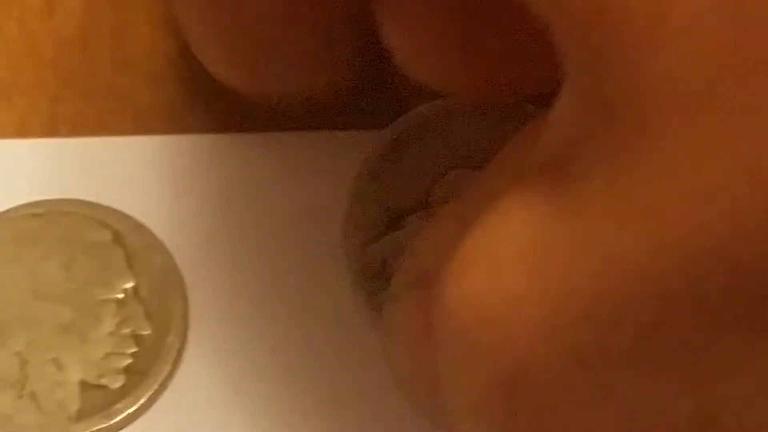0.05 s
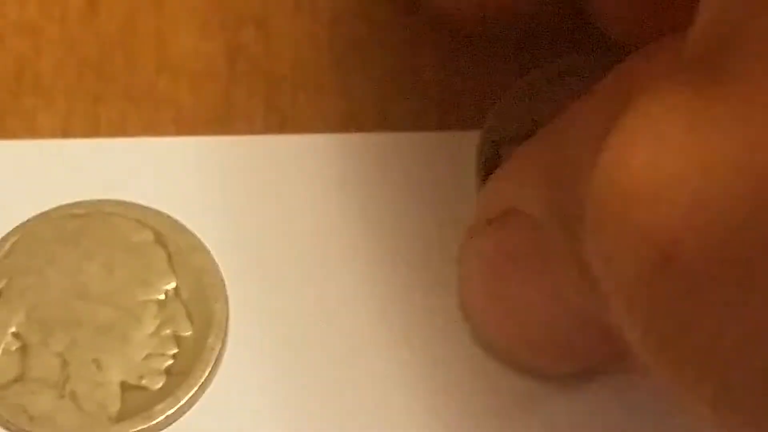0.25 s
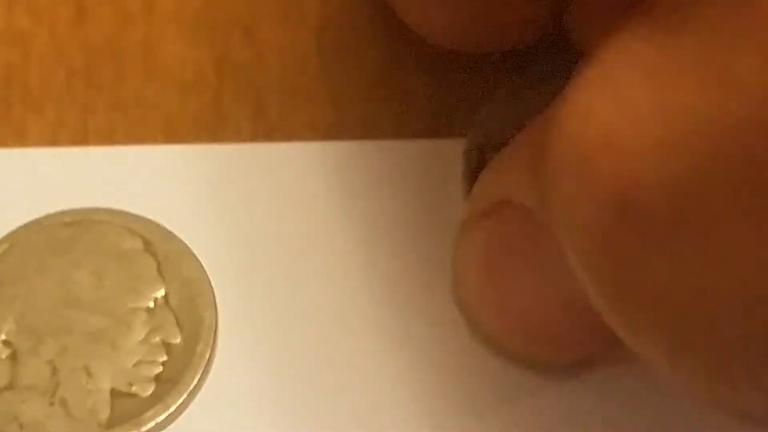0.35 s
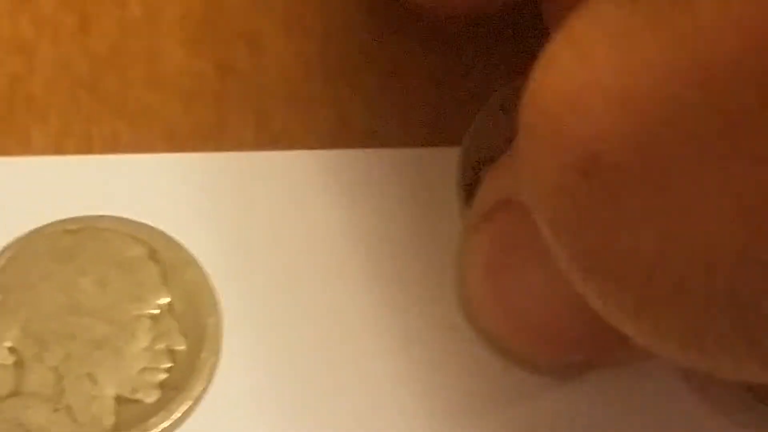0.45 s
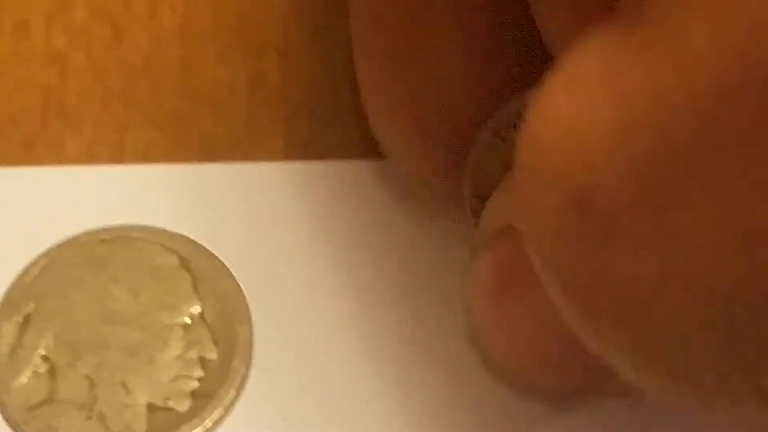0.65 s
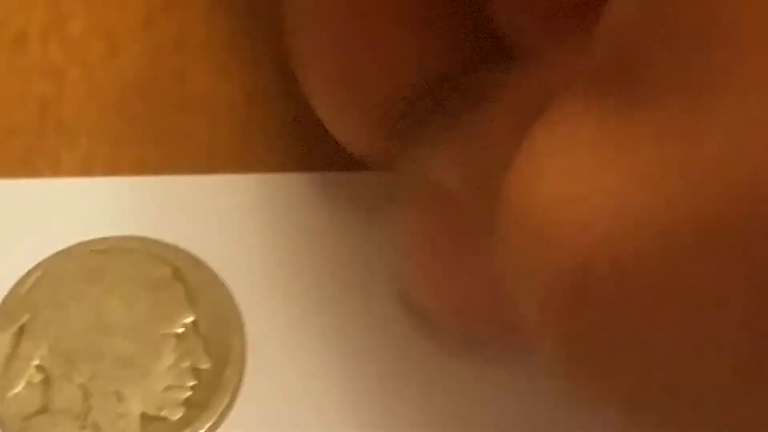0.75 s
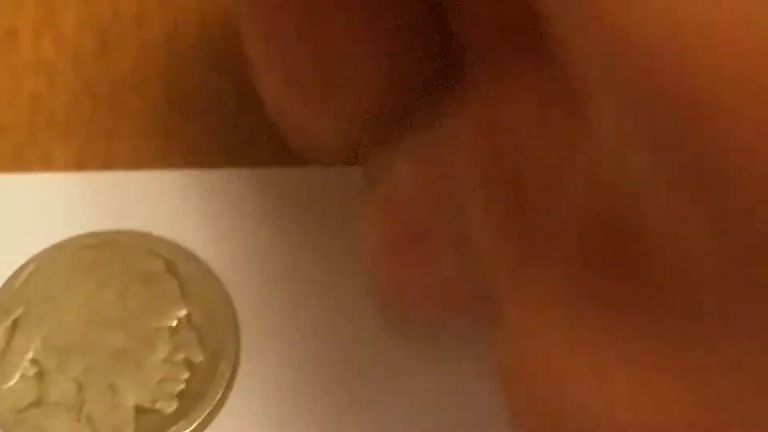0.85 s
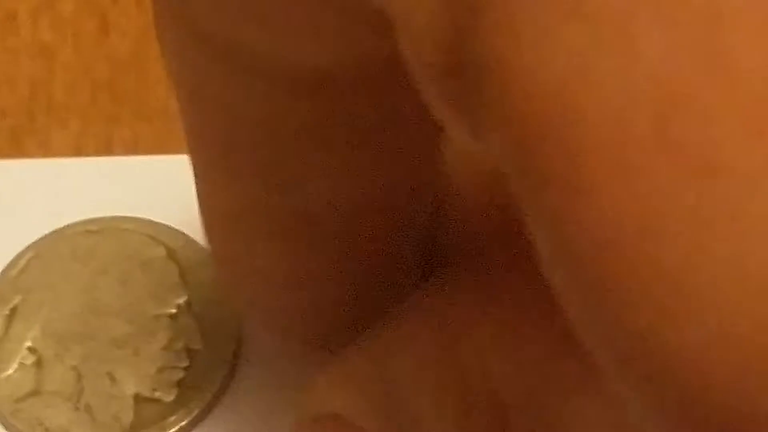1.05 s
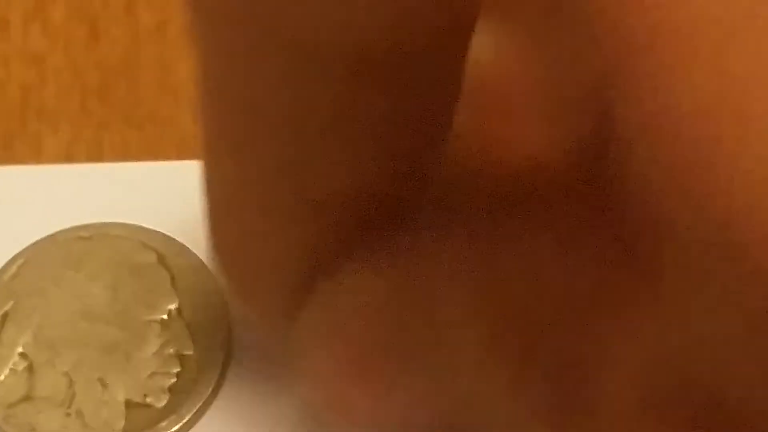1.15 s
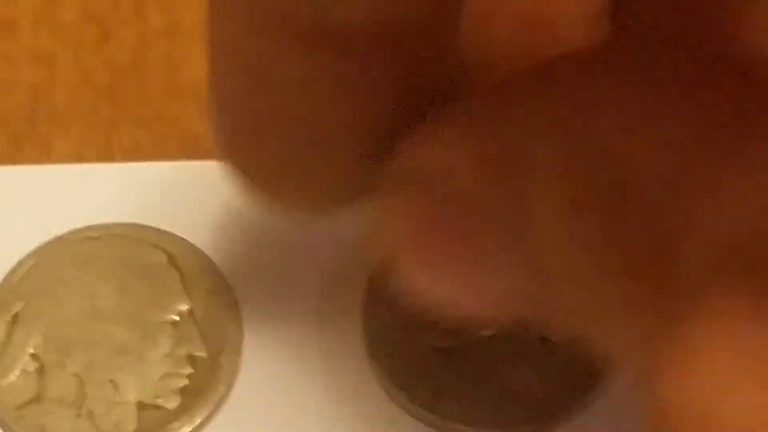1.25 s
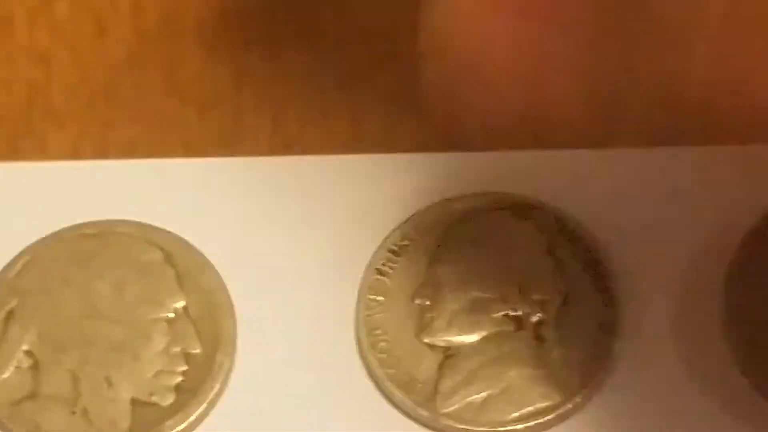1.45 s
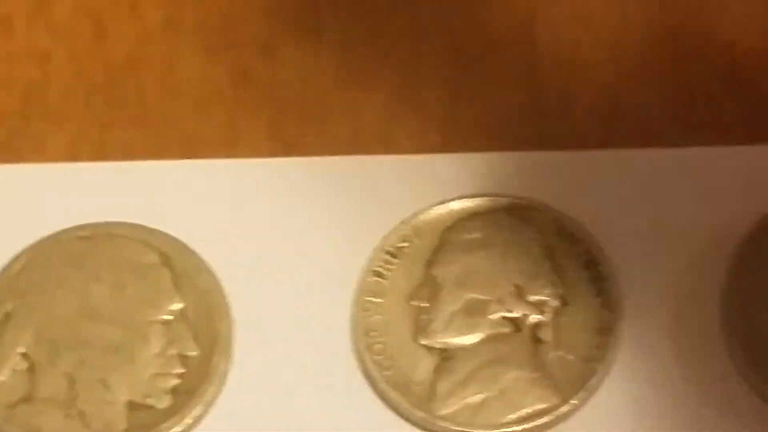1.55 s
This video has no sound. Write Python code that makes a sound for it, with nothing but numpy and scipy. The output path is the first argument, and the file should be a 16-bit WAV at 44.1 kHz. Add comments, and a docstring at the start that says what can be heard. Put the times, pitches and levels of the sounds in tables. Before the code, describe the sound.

Two close clicks of a coin turned over on a desk, the second one softer.

```python
"""A small coin is turned over by hand on a sheet of paper that lies on a wooden desk, heard close by.
It snaps down, rings very high for a moment and hits again; fingers nudge it and it is laid flat with a
lighter click. Each impact excites the coin's modes, and the small room answers it. Dull thumps sound
underneath and a finger brushes the paper. Low hum and hiss sink in the middle and come back."""
import sys
import numpy as np
from scipy import signal
from scipy.fft import rfft, irfft
from scipy.io import wavfile
from scipy.ndimage import uniform_filter1d

SR = 44100
rng = np.random.default_rng(int(sys.argv[2]) if len(sys.argv) > 2 else 0)


def unload_audio(sound):
    """Save the sound as a 16-bit wav file, at the path given as the first command line argument."""
    columns = np.transpose(np.atleast_2d(sound))
    # keep every value between -1 and 1, then stretch to whole-number steps
    steps = np.round(np.clip(columns, -1, 1) * 32767)
    wavfile.write(sys.argv[1], SR, steps.astype(np.int16))


N = 70560
T = np.arange(N) / SR
HZ = np.maximum(np.fft.rfftfreq(2 * N, 1 / SR), 1)

# Course of the background. Each row: time in seconds, then hum, rumble, hiss and treble levels in dB.
BACKGROUND_LEVELS = [(0, -58, -49.5, -58.5, -76.5), (0.132, -49.5, -58.5, -58, -78),
                     (0.191, -62, -54, -64.5, -82.5), (.33, -58, -65, -66, -82),
                     (.47, -64.5, -68.5, -76, -98), (.62, -63.5, -67, -79.5, -97),
                     (.87, -71, -76.5, -87, -99), (1.049, -67.5, -71.5, -89, -95.5),
                     (1.19, -62, -67, -80.5, -98), (1.319, -59, -62.5, -71.5, -83.5),
                     (1.45, -57.5, -59, -69.5, -93), (1.6, -59.5, -62.5, -67, -89.5)]
# Course of the deepest rumble. Each row: time in seconds, level in dB.
DEEP_LEVELS = [(0, -61.5), (.08, -65), (.15, -66), (.3, -64.5), (.5, -68.5), (.85, -82.5), (1.1, -71),
               (1.25, -71), (1.42, -66), (1.6, -74)]
# Spectra of the four background noises. Each row: frequency in Hz, relative spectral density in dB.
RUMBLE_SPECTRUM = [(40, -18.5), (85, -4), (130, 6.5), (185, -2.5), (215, -3.5), (330, -6.5), (450, -22),
                   (700, -49.5)]
HISS_SPECTRUM = [(350, 8.5), (600, 5.5), (850, 3.5), (1150, 4), (1650, -9.5), (2000, 0.5), (2350, 6),
                 (2700, -1.5), (3100, -21), (3600, -13.5), (4300, -2), (5000, -15), (6200, -32),
                 (9000, -39)]
TREBLE_SPECTRUM = [(3000, -13), (5000, -1.5), (7000, -11), (9500, 4), (14000, -2), (16000, -0.5)]
DEEP_RUMBLE_SPECTRUM = [(15, -6.5), (30, -7), (55, 0), (80, 1), (120, -17.5), (300, -50.5)]
# Dull low thumps. Each row: start in seconds, level in dB, frequency in Hz, t60 in seconds.
LOW_THUMPS = [(0.205, -44.5, 153.6, 0.15), (0.226, -44.5, 58.44, .14), (0.346, -64, 54, 0.4),
              (0.629, -56, 260, 0.029), (1.2022, -35, 212.4, 0.021), (1.367, -54, 68.1, 0.15)]
# Reverberation. Each row: frequency in Hz, gain in dB, t60 in seconds, extra gain on the right in dB.
ROOM_DECAY = [(150, -10.5, .3, 7.5), (302, -3, .26, 0.5), (560, -7, .3, 3.5), (1000, -1, 0.21, -3.5),
              (1600, -6.5, 0.24, -5.5), (2500, -0.5, 0.22, -6.5), (3500, -6.5, .31, -8),
              (4450, -6.5, .31, -5.5), (7300, -9, 0.27, -11.5), (9400, -6.5, 0.23, -15),
              (11500, -14, .27, -6), (13400, -7, .22, -4), (15000, -10, .16, -1)]
ROOM_EDGES_HZ = [90, 180, 300, 500, 800, 1200, 1700, 2300, 3100, 4000, 5200, 6700, 8500, 10500, 12500,
                 14000, 16000]
# Peaks and dips that colour the direct knocks, including a narrow ring near 9 kHz.
# Each row: frequency in Hz, gain in dB, Q.
IMPACT_COLOUR = [(240, 6, 0.55), (605, -6.5, 8.5), (1100, 2.5, 4), (1916, -4, 7.8), (2177, 13, 4.9),
                 (3316, -7.5, 5.7), (4110, 5, 4.4), (6230, -3.5, 4.3), (7300, -2.5, 5.2), (8940, 8.5, 20),
                 (10760, -5, 6.5), (13600, 1, 7.3)]
# Acoustic shadow on the right side. Each row: frequency in Hz, gain in dB.
RIGHT_SHADOW = [(150, -1), (400, -8.5), (1100, -4), (2300, -12.5), (4500, -10), (8700, -23.5), (11000, -16),
                (13500, -2.5)]
# Modes of the coin. Each row: frequency in Hz, relative level in dB, t60 in seconds.
COIN_MODES = [(12400, -12, .03), (13600, -7, .07), (14200, 0, .018), (14440, 16, .035)]
# The four bands of an impact (thud, knock, click, tick): their edges in Hz, then their factors on t60.
IMPACT_EDGES_HZ = [110, 900, 2900, 8200, 16000]
IMPACT_T60_FACTORS = [0.97, 1, 0.98, 0.68]
# Impacts of coin, paper and desk. Each row: start in seconds, gains in dB of thud, knock, click, tick and
# coin ring, t60 in seconds, extra loss on the right in dB, then frequency in Hz and gain in dB for each
# of two resonances of the struck spot.
IMPACTS = [(0.1998, -14.5, -16, -18, -15, -17, 0.016, 2.5, 1434, 4.4, 4600, 4.6),
           (0.2228, -24, -18.5, -26, -23.5, -46, 0.0091, -0.5, 1619, 3.8, 9020, 3.6),
           (0.3093, -60, -58, -55, -37, -60, .012, 0, 9000, 1, 13500, 3),
           (0.3514, -56, -53, -70, -67, -68, .016, 0, 1620, 21, 14000, 8),
           (0.6288, -47.5, -60.5, -79, -85.5, -99, 0.013, 1, 246, 4.2, 701, 1.97),
           (0.9904, -51.5, -61.5, -90, -96, -99, 0.015, -1.5, 1100, 9.7, 1675, 6.5),
           (1.2054, -40, -39, -36, -34.5, -69, 0.0107, 3.5, 2620, 9, 6380, 6.7)]


def from_db(db):
    """Amplitude grows tenfold with every 20 dB."""
    return 10 ** (np.asarray(db) / 20)


def unit_rms(x):
    """Division by the RMS value gives unit power."""
    return x / np.sqrt(np.mean(x ** 2) + 1e-20)


def at_hz(points, hz, column=1):
    """Interpolation of a table column on a logarithmic frequency axis."""
    table = np.array(points)
    return np.interp(np.log(hz), np.log(table[:, 0]), table[:, column])


def band(x, low, high, order=2):
    """A Butterworth filter passes the band between two frequencies in Hz."""
    sections = signal.butter(order, [low, min(high, SR / 2 - 100)], "band", fs=SR, output="sos")
    return signal.sosfilt(sections, x + 1e-18)


def colour(x, points):
    """A minimum-phase filter follows a table of Hz and dB; folding the cepstrum makes it causal."""
    cepstrum = irfft(np.log(from_db(at_hz(points, HZ))))
    cepstrum[1:N] *= 2
    cepstrum[N + 1:] = 0
    return irfft(rfft(x, 2 * N) * np.exp(rfft(cepstrum)))[..., :N]


def resonance(x, hz, gain_db, q):
    """A second-order peak or dip, narrower as Q rises."""
    a, w = from_db(gain_db / 2), 2 * np.pi * hz / SR
    k = np.sin(w) / (2 * q)
    zeros = [1 + k * a, -2 * np.cos(w), 1 - k * a]
    poles = [1 + k / a, -2 * np.cos(w), 1 - k / a]
    return signal.lfilter(zeros, poles, x + 1e-18)


def decay(t, t60):
    """Exponential damping from t = 0, by 60 dB in t60 seconds; silence before."""
    return (t >= 0) * np.exp(-np.log(1000) * np.maximum(t, 0) / t60)


def drift(rate_hz):
    """Low-passed noise wanders slowly, with unit power."""
    return unit_rms(irfft(rfft(rng.standard_normal(2 * N)) / (1 + (HZ / rate_hz) ** 2))[:N])


def stereo_noise(spectrum, correlation, left_db):
    """The ratio of side to mid sets the correlation; left_db raises the left and lowers the right."""
    mid, side = unit_rms(colour(rng.standard_normal((2, N)), spectrum))
    width = np.sqrt((1 - correlation) / (1 + correlation))
    sign = np.array([[1], [-1]])
    return (mid + width * side * sign) * from_db(left_db * sign)


def background(hum_hz=122.7, waver=0.083, right_lag_s=0.00086):
    """Superposition of wavering mains hum, rumble and hollow hiss, which sink and recover."""
    times, *levels_db = np.transpose(BACKGROUND_LEVELS)
    hum, rumble, hiss, treble = [from_db(np.interp(T, times, db)) for db in levels_db]
    phase = 2 * np.pi * hum_hz * (T - np.array([[0], [right_lag_s]]))
    tone = np.sin(phase + waver * drift(4)) * (1 + waver * drift(2.3))
    tone += from_db(-9.5) * np.sin(1.5 * phase + drift(5))  # third mains harmonic over the second
    return (hum * unit_rms(tone)
            + rumble * stereo_noise(RUMBLE_SPECTRUM, correlation=0.97, left_db=-1.5)
            + hiss * stereo_noise(HISS_SPECTRUM, correlation=0.1, left_db=4.5)
            + treble * stereo_noise(TREBLE_SPECTRUM, correlation=0.1, left_db=4.5))


def deep_rumble():
    """Weak correlation between the sides makes the lowest noise sound wide."""
    level_db = np.interp(T, *np.transpose(DEEP_LEVELS))
    return from_db(level_db) * stereo_noise(DEEP_RUMBLE_SPECTRUM, correlation=0.4, left_db=0)


def low_thumps():
    """Damped low oscillations are heard as dull thumps, the strongest under the coin's last tap."""
    thumps = np.zeros(N)
    for start, db, hz, t60 in LOW_THUMPS:
        t = T - start
        attack = np.clip(t * hz, 0, 1)  # one period long
        thumps += from_db(db) * attack * decay(t, t60) * np.sin(2 * np.pi * hz * t)
    return thumps


def finger_brush(centre_s=1.096, half_width_s=0.015, level_db=-81):
    """Friction of skin on paper gives a brief swell of high noise, weaker on the right."""
    envelope = np.exp(-((T - centre_s) / half_width_s) ** 2)
    friction = unit_rms(band(rng.standard_normal((2, N)), 2770, 10000))
    return from_db(level_db) * envelope * friction * from_db([[0], [-6]])


def room_reflections(x, delay_s=0.001, build_s=0.0045):
    """A diffuse field builds up, then dies away at its own rate in each band."""
    white = rng.standard_normal((2, 2, N))  # neighbouring bands take independent noise
    t = T - delay_s
    build_up = 1 - np.exp(-np.maximum(t, 0) / build_s)
    response = np.zeros((2, N))
    for k, (low, high) in enumerate(zip(ROOM_EDGES_HZ, ROOM_EDGES_HZ[1:])):
        db, t60, right_db = [at_hz(ROOM_DECAY, np.sqrt(low * high), column) for column in (1, 2, 3)]
        envelope = build_up * decay(t, t60)
        envelope /= np.sqrt(np.sum(envelope ** 2))
        response += from_db([[db], [db + right_db]]) * band(white[k % 2], low, high) * envelope
    return signal.fftconvolve(x[None], response, axes=1)[:, :N]


def acoustic_shadow(x, lag_s=0.00008):
    """Sound reaches the shadowed side filtered and slightly later."""
    delay = np.exp(-2j * np.pi * HZ * lag_s)
    return irfft(rfft(colour(x, RIGHT_SHADOW), 2 * N) * delay)[:N]


def crunch(t60, hold_s=0.0008, size=4096):
    """A rush of tiny contacts merges into broadband noise that holds briefly and decays."""
    envelope = decay(np.maximum(T[:size] - hold_s, 0), t60)
    burst = rng.standard_normal(size) * envelope
    for _ in range(4):  # in turn, flatten the spectrum and restore the envelope
        spectrum = rfft(burst)
        burst = irfft(spectrum / (np.abs(spectrum) + 1e-12))
        local_power = np.abs(uniform_filter1d(burst ** 2, size=24))
        burst *= envelope / np.sqrt(local_power + 1e-14)
    return burst / np.sqrt(np.sum(burst ** 2) / (SR * 0.002))  # energy of 2 ms at full scale


def impact(start, gains_db, t60):
    """A short contact spreads its energy over four bands, of which the highest dies soonest."""
    out = np.zeros(N)
    onset = int(start * SR)
    for low, high, db, factor in zip(IMPACT_EDGES_HZ, IMPACT_EDGES_HZ[1:], gains_db, IMPACT_T60_FACTORS):
        burst = from_db(db) * band(crunch(t60 * factor), low, high, order=3)
        out[onset:onset + len(burst)] += burst[:N - onset]
    return out


def coin_ring(start, db, swell_s=0.01):
    """Free vibration: the coin's modes swell as it comes free and are damped by paper and fingers."""
    t = np.maximum(T - start, 0)
    swell = 1 - np.exp(-t / swell_s)
    return swell * sum(from_db(db + mode_db) * decay(t, t60) * np.sin(2 * np.pi * hz * t)
                       for hz, mode_db, t60 in COIN_MODES)


def coin(top_hz=14600, ring_right_db=-10):
    """Impact excitation: each touch drives the resonances of struck spot, room and coin."""
    knocks, rings = np.zeros((2, N)), np.zeros(N)
    for start, *gains_db, ring_db, t60, right_loss_db, low_hz, low_db, high_hz, high_db in IMPACTS:
        touch = impact(start, gains_db, t60)
        touch = resonance(touch, low_hz, low_db, q=3.5)
        touch = resonance(touch, high_hz, high_db, q=3.2)
        knocks += touch * from_db([[0], [-right_loss_db]])
        rings += coin_ring(start, ring_db)
    knocks = signal.sosfilt(signal.butter(8, top_hz, fs=SR, output="sos"), knocks)
    reflections = room_reflections(knocks[0])
    for hz, gain_db, q in IMPACT_COLOUR:
        knocks = resonance(knocks, hz, gain_db, q)
    left = knocks[0] + rings
    right = acoustic_shadow(knocks[1]) - from_db(ring_right_db) * rings  # ring in opposite phase
    return np.array([left, right]) + reflections


def scene():
    """The sound pressures of coin, finger, thumps and background add linearly."""
    return coin() + finger_brush() + low_thumps() + background() + deep_rumble()


def record(dry):
    """An elliptic low-pass cuts the highest treble steeply."""
    cutoff_hz = 14750
    return signal.sosfilt(signal.ellip(10, 0.2, 70, cutoff_hz, fs=SR, output="sos"), dry)


dry = scene()
out = record(dry)
unload_audio(out)
```